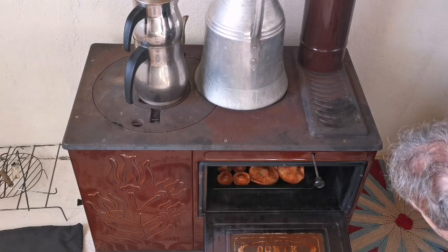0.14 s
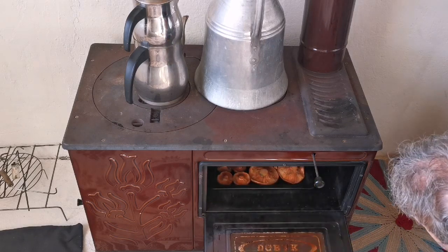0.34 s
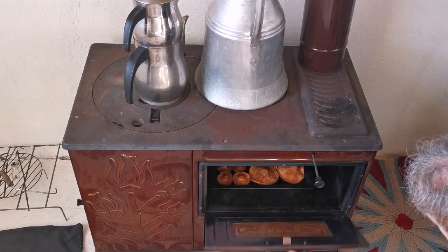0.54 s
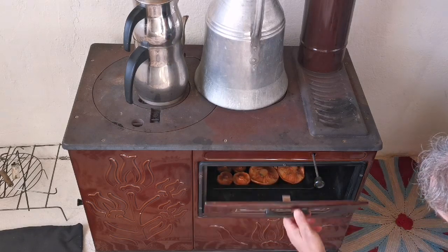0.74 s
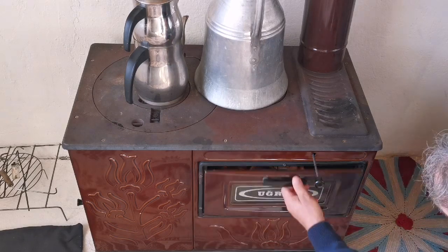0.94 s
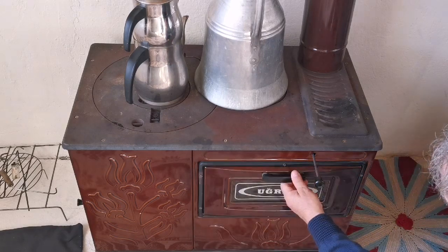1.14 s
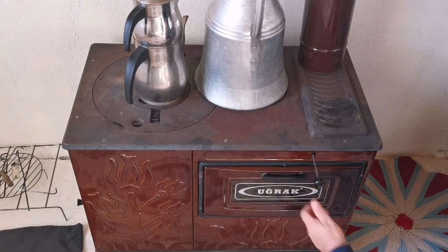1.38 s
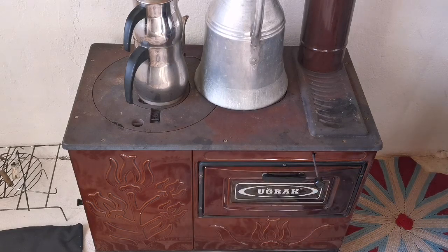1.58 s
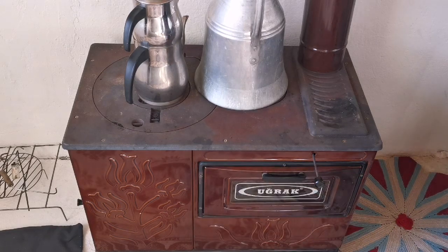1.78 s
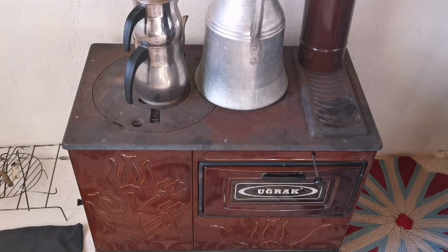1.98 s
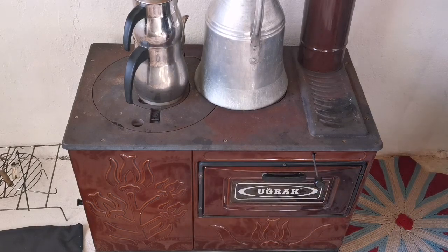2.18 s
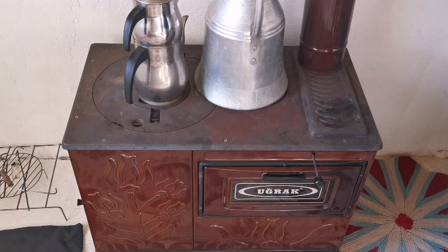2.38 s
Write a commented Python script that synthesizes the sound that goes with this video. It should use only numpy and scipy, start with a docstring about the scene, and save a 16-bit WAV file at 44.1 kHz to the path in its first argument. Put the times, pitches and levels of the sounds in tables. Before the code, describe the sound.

After a quiet second of faint low rumble and cloth rustle, a stove's metal oven door clacks shut, its body booming briefly, the handle ticking as it settles; quiet small room, nearby stereo microphone.

```python
"""Stove door shut in a small kitchen

A sheet-metal oven door on a wood stove is pushed shut: the latch scrapes, the door lands on its frame
in a few quick contacts, and the handle settles. Clicks set the tuned modes of door and stove body ringing
and light up a dense noise clash; short delays add the kitchen. Filtered noise makes the clothes rustle,
the faint rumble of the stove's body and the room floor, in stereo through a microphone with little deep bass."""
import sys
import numpy as np
from scipy import signal
from scipy.fft import rfft, irfft, next_fast_len
from scipy.io import wavfile

SR = 44100
rng = np.random.default_rng(int(sys.argv[2]) if len(sys.argv) > 2 else 0)


def volts_from_decibels(level):
    """Turn decibel levels (scalar or array-like) into linear amplitude factors."""
    exponent = np.asarray(level, float) / 20
    return 10 ** exponent


def master_out(mix):
    """Clip the mix to full scale and print it as 16-bit PCM to the path in sys.argv[1]."""
    frames = np.transpose(np.atleast_2d(mix))
    ceiling = np.clip(frames, -1, 1)
    pcm = np.round(ceiling * 32767).astype(np.int16)
    wavfile.write(sys.argv[1], SR, pcm)


N = 106457  # length in samples

# All levels are relative, ahead of the microphone.
# stereo width of the noises: pitch_hz, side_minus_mid_db
NOISE_WIDTH = [(40, -28), (125, -23), (250, -21), (500, -17.5), (1000, -12), (2000, -5), (4500, -1),
               (15000, -1)]
# balance of the noises: pitch_hz, left_minus_right_db
NOISE_LEAN = [(60, .1), (240, .3), (950, .5), (3770, 1.4), (8000, -.6), (15000, 1)]
BAND_EDGES_HZ = 24 * 2 ** np.arange(0, 9.7, .4)

# colour of the room floor: pitch_hz, density_db
FLOOR_COLOUR = [(20, -17), (111, -0.5), (250, -7), (476, -16), (863, -16), (2840, -24), (7000, -28.5),
                (9000, -28), (16000, -37)]
FLOOR_DB = -66.5
ROOM_LEAN_DB = 0.68  # floor, rumble and clothes: left up and right down by this

# rumble over time: start_s, level_db
RUMBLE_LEVEL = [(0, -53), (.1, -56), (.29, -58.5), (.35, -52), (.45, -58), (.65, -62.5), (.75, -67.5),
                (1.038, -68.5), (1.2, -37), (1.26, -43.5), (1.34, -37.5), (1.449, -46.5), (1.55, -51),
                (1.68, -54), (1.761, -57), (1.87, -57), (2, -66), (2.2, -66.5), (2.41, -82)]
# resonances in the rumble: pitch_hz, level_db, width_hz
RUMBLE_RESONANCES = [(101, -5.5, 13), (163.4, -2, 14), (255.6, 1, 6.4), (406.5, -12, 40), (510, -10, 12),
                     (1081, -19.5, 12)]
# colour of the broad rumble: pitch_hz, density_db
RUMBLE_COLOUR = [(15, -40), (25, -20.5), (60, -8.5), (98, -4.5), (230, -3.5), (330, -9.5), (493, -12),
                 (796, -23.5), (1500, -42.5), (3300, -68)]
RUMBLE_BROAD_DB = -1.5  # against the resonances together

# clothes rustles: start_s, rise_s, hold_s, fall_t60_s, level_db, tilt_db_per_octave
RUSTLES = [(0.299, 0.018, .03, .3, -66.5, -7), (.34, 0.0017, 0.042, 0.44, -58.5, 0.5),
           (0.407, 0.0091, 0.043, 0.31, -58.5, -2.8), (0.596, 0.059, 0.12, 0.65, -75, -3.5),
           (1.712, 0.052, 0.087, 1.84, -62, 2.5), (1.945, 0.019, .1, .5, -67, 0.5),
           (2.226, 0.062, .1, .5, -67.5, 2), (2.326, 0.033, .05, .3, -67, -1)]
# colour of the cloth: pitch_hz, density_db
RUSTLE_COLOUR = [(350, -33), (600, -9.5), (944, -13.5), (1490, -3.5), (3250, -11), (5000, -13.5),
                 (7020, -7.5), (8620, -18), (16000, -16.5)]
RUSTLE_FLICKER_DB = 1.0  # spread of each of two wanders

# contacts of door, latch and frame: start_s, level_db, tilt_db_per_octave, dull_above_hz
CONTACTS = [(1.043, -49.5, -1.5, 3000), (1.0544, -33, 3.5, 14000), (1.062, -25.5, 0.5, 14000),
            (1.0701, -15, 2, 14000), (1.0773, -18, -2, 14000), (1.089, -24, -2.6, 12000),
            (1.113, -27.5, -4.5, 12000), (1.16, -42, -7, 8000), (1.189, -35.5, 0, 5000),
            (1.281, -40.5, 1.5, 4000), (1.295, -48, 1.5, 3500), (1.321, -48, 4, 3000),
            (1.373, -48, 1.5, 4000), (1.389, -57, -3, 3000), (1.502, -53.5, -1, 2500),
            (1.531, -55.5, 0, 2500)]
TILT_FROM_HZ = 160  # the tilt is flat below
# modes of the door: pitch_hz, level_db, t60_s
DOOR_MODES = [(604, -11.5, 0.33), (722, -6, 0.18), (920, -2.5, .24), (917, -4.5, 0.12), (1134, 4, .2),
              (1323, -6, .2), (1411, -4, 0.3), (1788, -5, 0.12), (2296, -4.5, 0.22), (2383, -7, 0.24),
              (4790, -9, .18), (5920, -11.5, .15), (7600, -16.5, 0.1)]
DOOR_DB, MODE_SPREAD_DB = -13.5, 2.5
# modes of the stove body: pitch_hz, level_db, t60_s
BODY_MODES = [(62.3, 6, .3), (79.7, 3, 0.17), (109.5, -2, 0.38), (158.8, -1, .5), (179.6, -5, 0.14),
              (247.5, -3.5, 1.48), (274.2, 1, 0.31), (421.2, -7.5, .4), (477, -6.5, .5), (1024, -12, 1.2)]
BODY_DB, BODY_PUSH_S = -20.5, 0.0031
STOVE_LOW_HZ = 56.6  # the stove radiates little below

# colour of the dense clash: pitch_hz, density_db
CLASH_COLOUR = [(30, -31.5), (48, -21), (65, -1.5), (151, -9), (345, -13.5), (715, -7), (810, -13.5),
                (1150, -7), (1520, -7.5), (3500, -20), (7170, -17.5), (9220, -24), (16000, -28)]
# decay of the clash: pitch_hz, t60_s
CLASH_T60 = [(50, 0.35), (150, 0.49), (500, 0.67), (1200, 0.26), (3000, 0.28), (8000, .21), (11000, 0.28),
             (16000, 0.24)]
CLASH_DB, CLASH_RISE_S = -1.5, 0.0005

KITCHEN_T60_S, KITCHEN_DB = 0.13, -26.5  # decay time of the bass
WALL_CUT_HZ, KITCHEN_WIDE_FROM_HZ = 1300, 1200
MIC_LOW_HZ, MIC_STEP_HZ, MIC_STEP_DB, MIC_TOP_HZ = 25, 8000, -10, 15800


def rms_one(x):
    """Scale to rms 1."""
    return x / np.sqrt(np.mean(x ** 2) + 1e-20)


def at_hz(points, hz):
    """Read a table on a log-frequency axis."""
    table_hz, values = np.array(points)[:, 0], np.array(points)[:, 1]
    return np.interp(np.log(hz), np.log(np.maximum(table_hz, 1)), values)


def drift(rate_hz):
    """Slow random wander with spread 1: noise through two low-pass poles, drawn every 40 samples."""
    r = np.exp(-2 * np.pi * rate_hz * 40 / SR)
    noise = rng.standard_normal(N // 40 + 2002)
    slow = signal.lfilter([1], [1, -2 * r, r * r], noise)[2000:]  # skip the filter's start
    return np.interp(np.arange(N) / 40, np.arange(len(slow)), rms_one(slow))


def ring(push, hz, t60):
    """A two-pole resonance: a unit click sets a dying sine of starting height 1 ringing."""
    r = volts_from_decibels(-60 / (t60 * SR))
    w = 2 * np.pi * hz / SR
    return signal.lfilter([0, np.sin(w)], [1, -2 * r * np.cos(w), r * r], push + 1e-18)


def smooth(x, seconds):
    """One-pole low-pass with this time constant."""
    r = np.exp(-1 / (seconds * SR))
    return signal.lfilter([1 - r], [1, -r], x)


def noise_bands(spectrum):
    """Stereo noise bands coloured by a spectrum, together of rms 1: (centre Hz, band)."""
    size = N + 4000
    white = rng.standard_normal((2, 2, size))  # two sources, each mid and side
    bin_hz = np.arange(1, size // 2 + 2) * SR / size
    white[:, 1] = irfft(rfft(white[:, 1]) * volts_from_decibels(at_hz(NOISE_WIDTH, bin_hz)), size)
    bands = []
    for k, (low, high) in enumerate(zip(BAND_EDGES_HZ, BAND_EDGES_HZ[1:])):
        band_pass = signal.butter(2, [low, high], "band", fs=SR, output="sos")
        # neighbouring bands take different sources; the filter's start is skipped
        mid, side = signal.sosfilt(band_pass, white[k % 2])[:, 4000:]
        hz = np.sqrt(low * high)
        lean = at_hz(NOISE_LEAN, hz) / 2
        pair = mid + side * [[1], [-1]]
        bands.append((hz, volts_from_decibels(at_hz(spectrum, hz)) * volts_from_decibels(np.array([[lean], [-lean]])) * pair))
    total = np.sqrt(sum(np.mean(band ** 2) for _, band in bands))
    return [(hz, band / total) for hz, band in bands]


def room_floor():
    """Steady coloured noise whose bands wander in level on their own."""
    return volts_from_decibels(FLOOR_DB) * sum(volts_from_decibels(1.7 * drift(11)) * band for _, band in noise_bands(FLOOR_COLOUR))


def rumble():
    """Lumpy noise in the stove body's low resonances and around them."""
    lines = 0
    for hz, level_db, width_hz in RUMBLE_RESONANCES:
        t60 = np.log(1000) / (np.pi * width_hz)
        lines = lines + volts_from_decibels(level_db) * rms_one(ring(rng.standard_normal(N), hz, t60))
    broad = sum(volts_from_decibels(3.2 * drift(9.1)) * band for _, band in noise_bands(RUMBLE_COLOUR))
    start_s, level_db = np.transpose(RUMBLE_LEVEL)
    level = volts_from_decibels(np.interp(np.arange(N) / SR, start_s, level_db) + 1.2 * drift(5))
    return level * (rms_one(lines) + volts_from_decibels(RUMBLE_BROAD_DB) * broad)


def clothes():
    """Noise for rubbing cloth: each rustle rises, holds and dies; the bands flicker a little."""
    t = np.arange(N) / SR
    shapes, tilts = [], []
    for start, rise, hold, t60, db, tilt in RUSTLES:
        falling_s = np.maximum(t - start - rise - hold, 0)
        shapes.append(np.clip((t - start) / rise, 0, 1) * volts_from_decibels(db - 60 * falling_s / t60))
        tilts.append(tilt)
    shared_flicker = drift(40)
    out = 0
    for hz, band in noise_bands(RUSTLE_COLOUR):
        octaves = np.log2(hz / 3000)
        power = sum((shape * volts_from_decibels(tilt * octaves)) ** 2 for shape, tilt in zip(shapes, tilts))
        flicker = volts_from_decibels(RUSTLE_FLICKER_DB * (shared_flicker + drift(12)))
        out = out + np.sqrt(power) * flicker * band
    return out


def contact_clicks(hz, spread_db):
    """The contacts as clicks, weighted for one pitch: tilted about 1 kHz, with random strengths."""
    start_s, level_db, tilt, dull_hz = np.transpose(CONTACTS)
    tilt_db = tilt * np.log2(max(hz, TILT_FROM_HZ) / 1000)
    random_db = spread_db * rng.standard_normal(len(start_s))
    clicks = np.zeros(N)
    clicks[(start_s * SR).astype(int)] = volts_from_decibels(level_db + tilt_db + random_db) / (1 + (hz / dull_hz) ** 2)
    return clicks


def door():
    """Every contact strikes each mode of door and body with a strength of its own; the body is pushed softly."""
    plate = 0
    for hz, db, t60 in DOOR_MODES:
        plate = plate + volts_from_decibels(DOOR_DB + db) * ring(contact_clicks(hz, MODE_SPREAD_DB), hz, t60)
    body = 0
    for hz, db, t60 in BODY_MODES:
        push = smooth(contact_clicks(hz, MODE_SPREAD_DB), BODY_PUSH_S)
        make_up = np.hypot(1, 2 * np.pi * hz * BODY_PUSH_S)  # what the soft push loses at this pitch
        body = body + volts_from_decibels(BODY_DB + db) * make_up * ring(push, hz, t60)
    return plate + body


def clash():
    """Modes too dense to tell apart: noise that each contact lights up, dying band by band."""
    out = 0
    for hz, band in noise_bands(CLASH_COLOUR):
        decay = volts_from_decibels(-120 / (at_hz(CLASH_T60, hz) * SR))  # power falls 60 dB in one t60
        power = signal.lfilter([1], [1, -decay], contact_clicks(hz, 0) ** 2 + 1e-18)
        out = out + np.sqrt(smooth(power, CLASH_RISE_S)) * band
    return volts_from_decibels(CLASH_DB) * out


def kitchen(x):
    """Eight feedback delays a side, duller on every round; the bass is alike on both sides."""
    size = next_fast_len(N + SR)
    w = 2 * np.pi * np.arange(size // 2 + 1) / size
    spectrum = rfft(x, size)
    dull = 1 / (1 + 1j * w * SR / (2 * np.pi * WALL_CUT_HZ))
    out = np.zeros((2, N))
    for k, lag_s in enumerate(rng.uniform(.012, 0.032, 16)):
        loop = volts_from_decibels(-60 * lag_s / KITCHEN_T60_S) * dull * np.exp(-1j * w * lag_s * SR)
        echoes = irfft(spectrum * loop / (1 - loop), size)[:N]
        out[k % 2] += echoes * (-1) ** (k // 2)  # polarity alternates within a side
    mid, side = (out[0] + out[1]) / 2, (out[0] - out[1]) / 2
    wide = signal.lfilter(*signal.butter(1, KITCHEN_WIDE_FROM_HZ, "high", fs=SR), side)
    return mid + wide * [[1], [-1]]


def scene():
    """Room floor, rumble and clothes, with the slam of the stove door in its kitchen."""
    room = room_floor() + rumble() + clothes()
    struck = door()
    slam = struck + volts_from_decibels(KITCHEN_DB) * kitchen(struck) + clash()
    slam = signal.sosfilt(signal.butter(4, STOVE_LOW_HZ, "high", fs=SR, output="sos"), slam)
    return slam + room * volts_from_decibels(np.array([[ROOM_LEAN_DB], [-ROOM_LEAN_DB]]))


def band_limit(x):
    """A steep low-pass at the top of the band."""
    return signal.sosfilt(signal.butter(12, 16490, fs=SR, output="sos"), x)


def record(dry):
    """The microphone loses the deep bass, steps down in the treble and ends at its top pitch."""
    x = signal.sosfilt(signal.butter(2, MIC_LOW_HZ, "high", fs=SR, output="sos"), dry)
    size = next_fast_len(N)
    hz = np.arange(size // 2 + 1) * SR / size
    step = volts_from_decibels(MIC_STEP_DB * np.clip((hz - MIC_STEP_HZ) / 500 + .5, 0, 1))  # spread over 500 Hz
    top = np.clip((MIC_TOP_HZ - hz) / 150, 0, 1) ** 2  # fades out over the last 150 Hz
    mix = irfft(rfft(x, size) * step * top, size)[:, :N]
    return band_limit(mix)


dry = scene()
out = record(dry)
master_out(out)
```